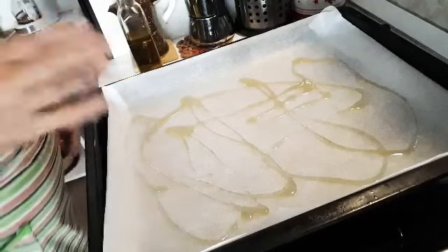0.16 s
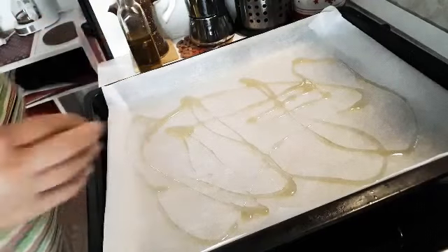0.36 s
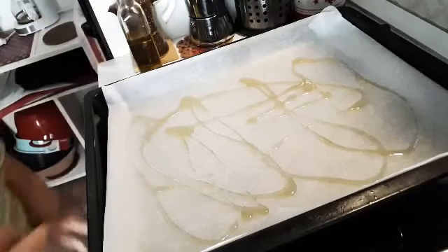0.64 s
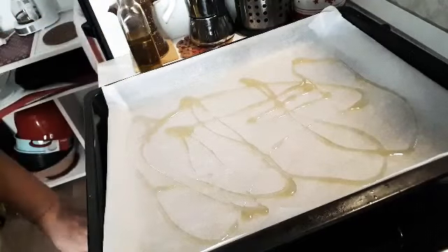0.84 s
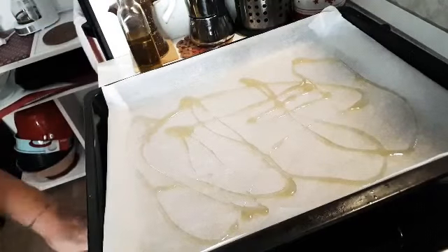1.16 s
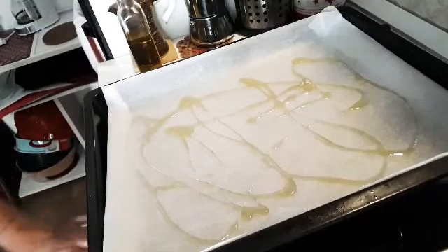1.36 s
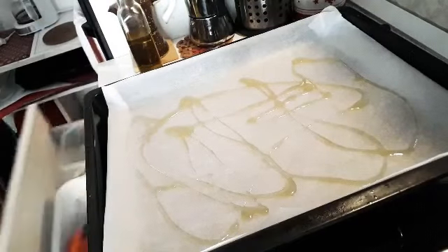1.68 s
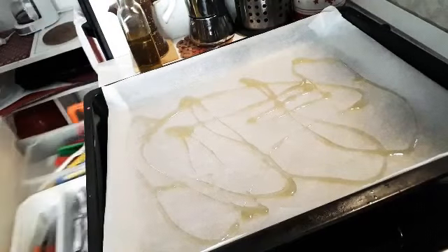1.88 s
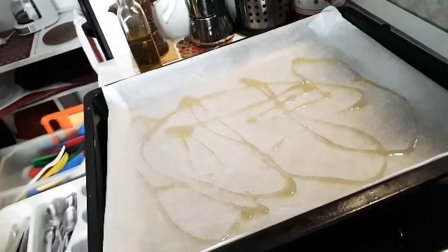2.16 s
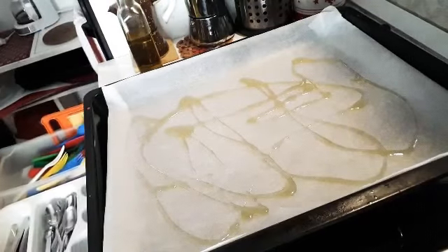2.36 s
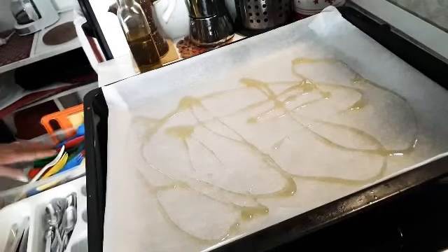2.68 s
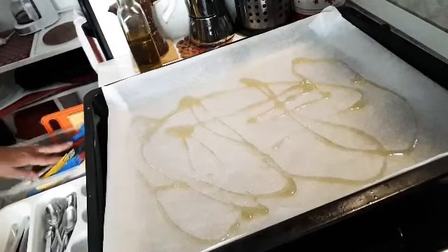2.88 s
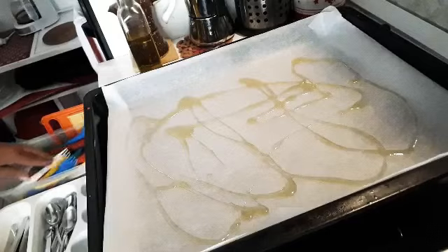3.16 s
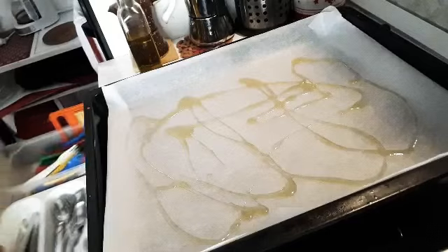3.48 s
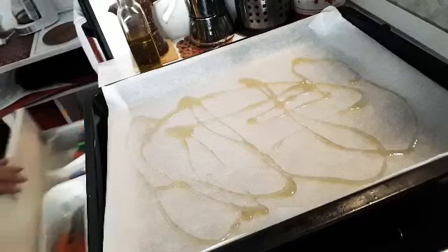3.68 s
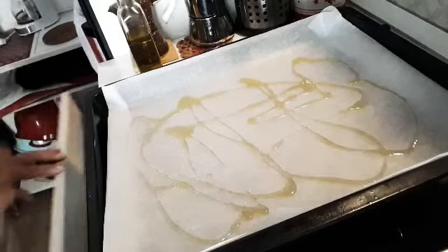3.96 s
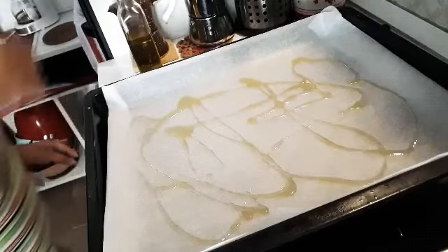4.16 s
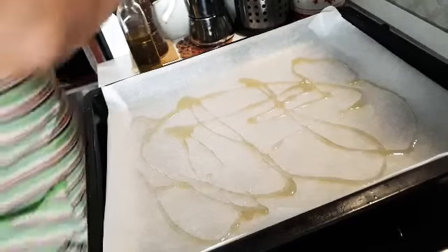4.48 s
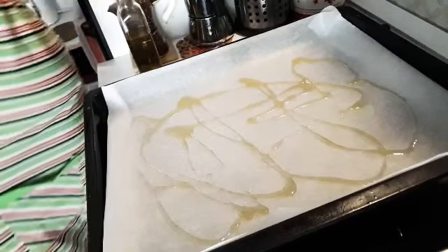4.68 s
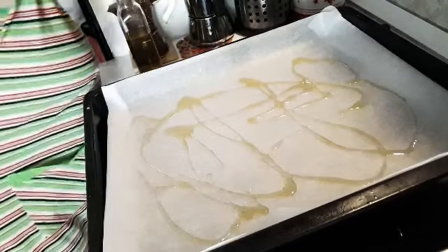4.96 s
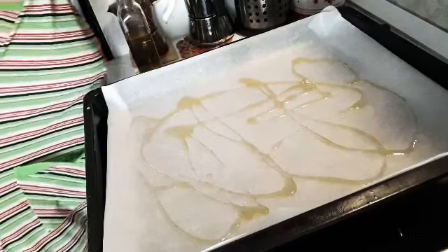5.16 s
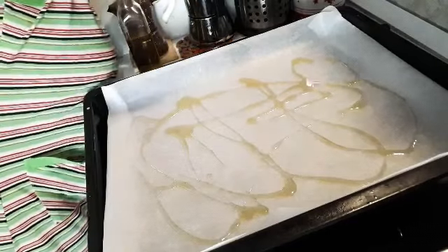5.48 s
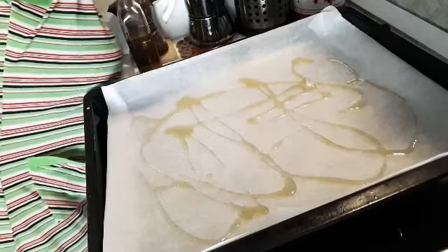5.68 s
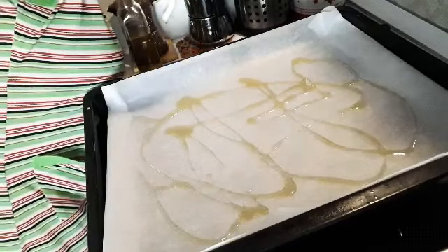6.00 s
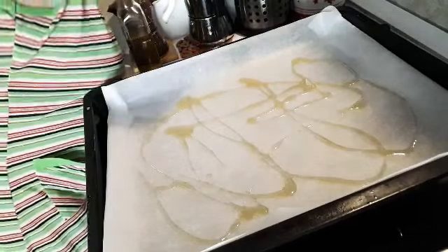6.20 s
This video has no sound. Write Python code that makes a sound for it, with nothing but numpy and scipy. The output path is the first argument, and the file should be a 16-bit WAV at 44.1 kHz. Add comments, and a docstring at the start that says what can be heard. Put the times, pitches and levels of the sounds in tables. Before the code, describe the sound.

Faint cloth rustle and low hum, a drawer rumbling open, utensils rattling, a hard wooden slam, then small clinks and a final heavy set-down thunk.

```python
"""A faint swish of clothes over an appliance hum, then a drawer rolls open and bumps its stop.
A hand stirs plastic utensils; the drawer is pushed shut with a jingle of cutlery and a slam.
Then things are slid, knocked and set down on the counter.
Blows ring damped modes, friction is filtered trains of random slips, cloth and air are filtered noise.
Two spaced microphones hear the small hard room as direct sound, early reflections and a tail."""
import sys
import numpy as np
from scipy import signal
from scipy.fft import rfft, irfft
from scipy.io import wavfile

SR = 44100
rng = np.random.default_rng(int(sys.argv[2]) if len(sys.argv) > 2 else 0)


def dump(signal):
    """Clip the signal to [-1, 1] and save it as 16-bit WAV at the path in sys.argv[1]."""
    limited = np.clip(np.atleast_2d(signal).T, -1, 1)
    pcm = np.round(limited * 32767).astype(np.int16)
    wavfile.write(sys.argv[1], SR, pcm)


N = 279098
TIME_S = np.arange(N) / SR

# drawer pulled out, then pushed in: (start [s], fastest [s], end [s], relative rumble at top speed [dB],
# relative grit at top speed [dB], slowing time constant [s], creep as share of top speed [1])
STROKES = [(1.327, 1.984, 2.29, -48, -62, 0.094, 0.037), (3.514, 3.798, 4.55, -48.5, -65, 0.21, 0.043)]
# drawer meets the end of its travel: (first touch [s], relative level [dB], thump offset [dB],
# click offset [dB], time between rebounds [s])
STOPS = [(2.292, -43.5, 4, -6, 0.028), (4.499, -26.5, -1.5, -10, .016)]
# box jolts on its rails: (time [s], relative level [dB], hardness [dB], rattle time constant [s])
JOLTS = [(1.965, -47, -11, 0.014), (3.452, -59.5, -14, 0.016), (3.61, -42.5, -7, 0.0033),
         (3.824, -48, -10, 0.004), (4.474, -58, -4, 0.0037)]
# plastic utensils and their tray: (time [s], relative level [dB], hardness [dB], rattle time constant [s])
UTENSIL_BLOWS = [(1.755, -46.5, -0.5, 0.015), (1.779, -34.5, -2, 0.0039), (1.791, -40.5, 4, 0.0091),
                 (1.812, -47.5, 1, 0.0025), (1.916, -54.5, 11.5, 0.0054), (2.039, -56, -6, 0.0088),
                 (2.924, -57.5, -1.5, 0.018), (2.958, -58, -7, .003), (3.007, -51, 0.5, 0.0025),
                 (3.025, -46.5, -1, 0.0064), (3.044, -53.5, 3.5, 0.0081), (3.073, -58.5, 12.5, 0.0021),
                 (3.084, -50, 2, 0.0035), (3.095, -55, -1, 0.0023), (3.128, -55, -8, 0.002),
                 (3.286, -56.5, 1.5, 0.011), (3.703, -55.5, -14, 0.0057)]
# cutlery slides and clinks: (time [s], relative level [dB], hardness [dB], rattle time constant [s])
CUTLERY_BLOWS = [(3.931, -47, 5.5, 0.025), (3.965, -38, -2, 0.0056), (3.981, -40.5, -4.5, .002),
                 (4.036, -39, -4, 0.008), (4.116, -59, 4, 0.0055)]
# taps on a hollow handle: (time [s], relative level [dB], pitch [Hz])
HANDLE_TAPS = [(2.962, -36, 1200), (3.128, -30, 1107)]
# plastic sliding on plastic: (middle [s], relative level [dB], bell half length [s])
SCRAPES = [(1.98, -58.5, 0.11), (2.965, -50.5, 0.032), (3.092, -48.5, 0.02), (3.22, -65.5, 0.077)]
# rasp of the rails: (middle [s], relative level [dB], bell half length [s], centre [Hz],
# pitch slope [octaves/s])
RASPS = [(1.567, -68.5, 0.063, 680, 7), (1.7, -60, .075, 1100, -1.5), (3.572, -66, 0.016, 1490, 4),
         (3.675, -61.5, 0.078, 1240, 3.5), (3.715, -63, 0.019, 2300, -7), (3.818, -57, .025, 577, 13)]
# faint squeak of a runner: (middle [s], relative level [dB], bell half length [s])
SQUEAKS = [(2.21, -73, 0.071)]
# cabinet booms when jolted: (time [s], relative level [dB])
BOOMS = [(1.307, -53), (1.93, -68), (2.03, -60), (2.329, -39.5), (2.389, -35), (2.548, -52), (4.503, -29.5),
         (4.566, -32), (4.655, -47.5), (4.769, -50.5), (4.851, -49), (5.015, -56.5)]
# kitchenware knocks on the counter: (time [s], relative level [dB], hardness [dB], rattle time constant [s])
WARE_BLOWS = [(5.276, -70, -3.5, 0.01), (5.36, -53, -5, 0.007), (5.386, -51, 1, 0.0032),
              (5.494, -51, 4.5, 0.0043), (5.546, -50.5, 7.5, 0.0084), (5.563, -49, -3.5, 0.011),
              (5.708, -60, -7, 0.0023), (5.798, -58.5, 1, 0.0023), (5.859, -69.5, 1.5, 0.0089),
              (5.912, -59.5, 3, 0.0093), (5.93, -53.5, -3, 0.0034), (5.956, -57, -9, 0.0063),
              (6.028, -59, -9, 0.0052), (6.059, -54, 3.5, 0.0026), (6.114, -48.5, 6.5, 0.0015),
              (6.155, -58.5, -8, 0.0087), (6.222, -52, 2, 0.0037), (6.24, -32.5, 2.5, 0.0042),
              (6.247, -36.5, 3.5, 0.0085)]
# something heavy lands on the worktop: (time [s], relative level [dB])
LANDINGS = [(5.361, -64), (5.566, -46), (5.708, -54), (6.114, -45), (6.24, -17.5)]
# glass bottle nudged: (time [s], relative level [dB])
BOTTLE_CLINKS = [(5.388, -57), (5.496, -64), (5.566, -44.5)]
# small pieces tick together: (time [s], relative level [dB], pitch [Hz])
TICKS = [(5.33, -62, 2550), (5.362, -42, 2620), (5.468, -51, 1720), (5.865, -58, 4400), (5.932, -42, 4110),
         (6.117, -32, 5420), (6.159, -45, 4050), (6.188, -46, 2640)]
# kitchenware slides over the counter: (middle [s], relative level [dB], bell half length [s])
SLIDES = [(5.335, -75, 0.02), (5.47, -53, 0.06), (5.9, -71, 0.048), (6.19, -49.5, 0.062)]
# clothes swish: (middle [s], relative level [dB], bell half length [s])
SWISHES = [(.06, -62.5, 0.053), (0.564, -71, 0.054), (0.94, -69, 0.062), (1.21, -58, 0.07),
           (1.534, -70.5, 0.061), (2.263, -65, 0.082), (2.803, -75, 0.036), (4.34, -71.5, 0.14),
           (4.74, -62, 0.11), (4.888, -64.5, 0.042)]
# appliance hum partials: (frequency [Hz], level [dB], waver depth [dB])
HUM = [(95.5, -72, -4.5), (199.6, -78, 0)]

# drawer box resonances: (frequency [Hz], relative level [dB], t60 [s])
DRAWER_MODES = [(160, 5, 0.18), (199, 9.5, 0.24), (311, 9, 0.16), (425, 4, 0.22), (523.5, 4, 0.22),
                (655, -6, 0.35), (825, -6, 0.13), (944, -10, 0.25), (1052, 1.5, 0.28), (1175, -7.5, 0.23),
                (1400, -14, 0.3), (1740, -7.5, 0.39), (1895, 0, .14)]
# plastic utensil resonances: (frequency [Hz], relative level [dB], t60 [s])
UTENSIL_MODES = [(433, -6.5, 0.041), (710, 9, 0.081), (1012, -2.5, 0.15), (1194, -28, 0.36),
                 (1224, -16, 0.08), (2187, 1, 0.051), (3380, -43, 0.026)]
# cutlery resonances: (frequency [Hz], relative level [dB], t60 [s])
CUTLERY_MODES = [(1860, 0.5, 0.055), (1880, 1, 0.065), (2239, -2.5, 0.099), (2350, -4.5, 0.1),
                 (3036, -6, .15), (3601, -1, 0.15), (4743, -9.5, .11)]
# kitchenware resonances: (frequency [Hz], relative level [dB], t60 [s])
WARE_MODES = [(520, 0, 0.0075), (645, 7.5, 0.15), (1886, 2.5, 0.12), (2410, -5.5, 0.14), (2622, -3, 0.098),
              (2780, -9, 0.11), (4100, -5, 0.071), (4860, -9, 0.15), (5200, -18, 0.2), (6200, -22, 0.17),
              (7560, -1, 0.093)]
# worktop resonances: (frequency [Hz], relative level [dB], t60 [s])
WORKTOP_MODES = [(292, -16.5, 0.12), (370, -28, 0.042), (580, 2.5, 0.034), (636, -20.5, 0.61)]
# glass bottle resonances: (frequency [Hz], relative level [dB], t60 [s])
BOTTLE_MODES = [(720, -0.5, 0.29), (2218, -18, 0.096), (3451, -4, 0.19), (3905, -4.5, 0.19),
                (5416, -7, 0.13), (7500, 2, 0.11)]

# dense short resonances of the drawer box: (frequency [Hz], relative level [dB per Hz])
DRAWER_COLOUR = [(30, -49), (55, -9.5), (100, 4.5), (200, 1), (270, -1.5), (450, -0.5), (800, -7),
                 (1300, -13), (2300, -11.5), (5000, -23.5), (8000, -26), (10000, -48.5), (15000, -46)]
# dense short resonances of the utensils: (frequency [Hz], relative level [dB per Hz])
UTENSIL_COLOUR = [(60, -23.5), (160, -4.5), (400, 8.5), (750, 1.5), (1200, -5.5), (1700, -5.5),
                  (2500, -4.5), (4500, -15), (7500, -17), (12000, -22.5), (15000, -41.5)]
# dense short resonances of the cutlery: (frequency [Hz], relative level [dB per Hz])
CUTLERY_COLOUR = [(60, -29), (150, -23.5), (550, -14.5), (900, -8), (1700, -12.5), (1950, 5), (2250, -5.5),
                  (4000, -13), (8000, -21.5), (11000, -27), (13000, -53)]
# dense short resonances of the kitchenware: (frequency [Hz], relative level [dB per Hz])
WARE_COLOUR = [(50, -34), (110, -3), (200, -5.5), (300, 2.5), (420, -3), (620, 1.5), (900, -11.5),
               (1400, -12), (2000, -13.5), (3500, -17), (7500, -20), (12000, -30), (15000, -31.5)]
# the whole load clashing: (frequency [Hz], relative level [dB per Hz])
LOAD_COLOUR = [(100, -21), (600, -1.5), (2000, 0), (5000, -6.5), (8000, -9.5), (12000, -10.5), (15000, -22)]
# roller rumble: (frequency [Hz], relative level [dB per Hz])
RUMBLE_COLOUR = [(100, -29), (250, -13), (340, 1), (550, -1.5), (680, -7.5), (900, -14), (1500, -21),
                 (2500, -36), (4000, -63)]
# growl of the hollow box: (frequency [Hz], relative level [dB per Hz])
GROWL_COLOUR = [(40, -38), (75, -3.5), (110, -4), (160, 7), (230, -3), (330, 0.5), (600, -40),
                (1500, -83.5)]
# grit in the rails: (frequency [Hz], relative level [dB per Hz])
GRIT_COLOUR = [(500, -7), (1000, 1.5), (1600, 3), (2300, 3), (4000, -9.5), (7500, -8.5), (10000, -35),
               (15000, -42)]
# plastic sliding on plastic: (frequency [Hz], relative level [dB per Hz])
RUSTLE_COLOUR = [(150, -20.5), (500, 12), (1200, 6), (2000, 1), (5000, -2.5), (8000, -8), (12000, -23.5),
                 (15000, -22)]
# fabric on fabric: (frequency [Hz], relative level [dB per Hz])
CLOTH_COLOUR = [(500, -46), (1000, -23), (1400, -14.5), (2700, -8.5), (4000, -9.5), (7800, -8.5),
                (15000, -20.5)]
# still air: (frequency [Hz], relative level [dB per Hz])
AIR_COLOUR = [(15, -51), (25, -8.5), (109, 1), (213, -16.5), (271, -13), (637, -24.5), (749, -20.5),
              (1310, -29.5), (1670, -30), (12800, -33.5), (15000, -34)]
# decay of the room: (frequency [Hz], t60 [s])
ROOM_T60 = [(100, 0.7), (250, 0.26), (800, 0.36), (2500, 0.3), (7000, 0.31), (15000, 0.33)]
# left-right agreement of diffuse sound: (frequency [Hz], coherence [1])
COHERENCE = [(60, 0.83), (130, 0.96), (300, 0.8), (640, 0.6), (1300, 0), (15000, 0.021)]
# microphone response: (frequency [Hz], gain [dB])
MICROPHONE = [(20, -8.5), (40, -0.5), (60, 0), (7900, 0), (9100, -4.5), (10800, -0.5), (13000, -0.5),
              (15000, -8.5)]
# borders of thump, knock and click: (lower [Hz], upper [Hz])
BAND_EDGES_HZ = (400, 2500)
# range of the thin partials of struck pieces: (lowest [Hz], highest [Hz])
TINKLE_HZ = (1497.4, 12130)

PUSH_POWER = 1.49  # speed grows with this power of time
GROWL_DB, GROWL_POWER = -4, 0.43  # growl against rumble; power of speed it follows
GRIT_POWER = 0.89  # power of speed the grit follows
LUMPS_DB, LUMPS_HZ = 3.7, 24.07  # rms depth and fastest rate of the uneven rolling
FIRST_TOUCH_DB, TOUCH_HARDNESS_DB = -3.5, 2.5  # light clicky touch ahead of the main strike
REBOUND_LOSS_DB, REBOUND_RATTLE_S = 4.5, 0.0072
LOAD_LAG_S, LOAD_DB, LOAD_HARDNESS_DB, LOAD_RATTLE_S = 0.042, -15, 8.5, 0.033
FIRST_CONTACT_DB = -2.5  # gain of a blow's first contact
RASP_WIDTH = 0.86  # bandwidth of each resonance / centre frequency
SQUEAK_HZ = 1950
TINKLE_T60_S, TINKLE_SPREAD_DB = 0.071, 4
TICK_OVERTONE, TICK_OVERTONE_DB = 1.3, -9  # second partial: ratio to pitch, level against the first
AIR_DB = -74.5
BAND_LIMIT_HZ = 15250


def drawer():
    """The box rolls, jolts and hits its stops; its load knocks, slides and clinks."""
    rails = blows(JOLTS, DRAWER_MODES, DRAWER_COLOUR, ring_db=1.0, chatter_db=30,
                  direct_db=6.5, lead_ms=0.28, thump_db=-23.5, click_db=-52)
    plastic = blows(UTENSIL_BLOWS, UTENSIL_MODES, UTENSIL_COLOUR, ring_db=-7.5, chatter_db=9,
                    direct_db=-7.5, lead_ms=0.22, thump_db=-10.0, click_db=-3.5, tinkle_db=-14)
    metal = blows(CUTLERY_BLOWS, CUTLERY_MODES, CUTLERY_COLOUR, ring_db=-7.5, chatter_db=7,
                  direct_db=-9.5, lead_ms=0.14, thump_db=-16, click_db=-9, tinkle_db=-11)
    stirring = friction(swells(SCRAPES), RUSTLE_COLOUR, 340, 7.4, 0.2)
    box = stops() + rails + plastic + handle() + stirring + runners() + rasp() + squeak()
    # left/right balance in dB
    return box * amp([[0.5], [-0.5]]) + metal * amp([[1.4], [-1.4]])


def runners():
    """Rumble, growl and grit follow different powers of speed; growl persists most at low speed."""
    rumble = growl = grit = 0
    for start_s, fastest_s, end_s, rumble_db, grit_db, slowing_s, creep in STROKES:
        v = speed(start_s, fastest_s, end_s, slowing_s, creep)
        rumble = rumble + amp(rumble_db) * v
        growl = growl + amp(rumble_db + GROWL_DB) * v ** GROWL_POWER
        grit = grit + amp(grit_db) * v ** GRIT_POWER
    lumps = amp(LUMPS_DB * waver(LUMPS_HZ))
    rolling = friction(rumble * lumps, RUMBLE_COLOUR, 900, 4.9, 0.17)
    growling = friction(growl * lumps, GROWL_COLOUR, 1400, 2.5, 0.2)
    return rolling + growling + friction(grit, GRIT_COLOUR, 820, 4.8, 0.2)


def speed(start_s, fastest_s, end_s, slowing_s, creep):
    """Share of top speed: gentle start, exponential slowing to a creep, dead halt at the end."""
    push = np.clip((TIME_S - start_s) / (fastest_s - start_s), 0, 1) ** PUSH_POWER
    coast = creep + (1 - creep) * np.exp(-np.maximum(TIME_S - fastest_s, 0) / slowing_s)
    return push * coast * (TIME_S < end_s)


def stops():
    """The wooden box strikes the end of its rails; its load clashes just after."""
    box = 0
    for s, db, thump_db, click_db, gap_s in STOPS:
        box = box + blows(rebounds(s, db, gap_s), DRAWER_MODES, DRAWER_COLOUR, ring_db=-8, chatter_db=7.5,
                          direct_db=-6.0, lead_ms=0.2, thump_db=thump_db, click_db=click_db, tinkle_db=-18)
    clashes = [(s + LOAD_LAG_S, db + LOAD_DB, LOAD_HARDNESS_DB, LOAD_RATTLE_S) for s, db, *_ in STOPS]
    load = blows(clashes, CUTLERY_MODES, LOAD_COLOUR, ring_db=-11, chatter_db=8.5,
                 direct_db=-6.5, lead_ms=0.2, thump_db=-7.5, click_db=-9, tinkle_db=-10)
    return box + load


def rebounds(s, db, gap_s, count=3):
    """Light touch, main strike, then evenly spaced weaker rebounds."""
    rows = [(s, db + FIRST_TOUCH_DB, TOUCH_HARDNESS_DB, REBOUND_RATTLE_S)]
    for k in range(count):
        rows.append((s + (k + 1) * gap_s, db - REBOUND_LOSS_DB * k, 0, REBOUND_RATTLE_S))
    return rows


def handle(t60_s=0.019, rise_s=0.00095, direct_db=-6):
    """A hollow handle gives a short pitched knock: one damped mode with a soft onset."""
    out, t = np.zeros((2, N)), np.arange(SR // 4) / SR
    for s, db, hz in HANDLE_TAPS:
        knock = modal([(hz, db, t60_s)], t) * (1 - np.exp(-t / rise_s))
        add(out, s, kitchen(knock, direct_db, 0.13))
    return out


def rasp(per_s=420, spread_db=4.0):
    """Uneven slips in the rails excite a broad resonance that glides in pitch."""
    out = 0
    for s, db, half_s, centre_hz, octaves_per_s in RASPS:
        hz = centre_hz * 2 ** (octaves_per_s * np.clip(TIME_S - s, -3 * half_s, 3 * half_s))
        width_hz = RASP_WIDTH * centre_hz
        grain = resonate(slips(per_s, spread_db), hz, width_hz)
        grain = resonate(grain, hz, width_hz)
        out = out + evened(grain) * swells([(s, db, half_s)])
    return kitchen(out, -9, 0.19)[:, :N]


def squeak(drift=0.012):
    """A dry runner squeaks: a thin tone of unsteady pitch (drift is its rms share)."""
    hz = SQUEAK_HZ * (1 + drift * waver(19))
    tone = np.sin(2 * np.pi * np.cumsum(hz) / SR)
    return kitchen(evened(tone) * swells(SQUEAKS), -7, 0.1)[:, :N]


def cabinet(hz=104, t60_s=0.32, rise_s=0.00264):
    """The cabinet's lowest mode booms on after the bumps."""
    out, t = np.zeros((2, N)), np.arange(SR) / SR
    decay = np.exp(-np.log(1000) * t / t60_s)
    boom = np.sin(2 * np.pi * hz * t) * decay * (1 - np.exp(-t / rise_s))
    for s, db in BOOMS:
        add(out, s, amp(db) * np.array([boom, boom]))
    return out


def counter():
    """Kitchenware is slid, nudged and set down; the worktop thunks and a bottle rings."""
    knocks = blows(WARE_BLOWS, WARE_MODES, WARE_COLOUR, ring_db=-8.5, chatter_db=4.5,
                   direct_db=-9.0, lead_ms=-0.09, thump_db=-3.5, click_db=-0.5, tinkle_db=-14.5)
    worktop = rings(LANDINGS, WORKTOP_MODES, contact_s=0.0035, room_db=-12)
    bottle = rings(BOTTLE_CLINKS, BOTTLE_MODES, contact_s=0.00044, room_db=-18)
    sliding = friction(swells(SLIDES), WARE_COLOUR, 300, 4.8, -0.09)
    return (knocks + worktop + bottle + ticks() + sliding) * amp([[0.3], [-0.3]])


def rings(rows, modes, contact_s, room_db):
    """A knock rings modes cleanly; a longer contact starts them more slowly."""
    out, t = np.zeros((2, N)), np.arange(SR // 2) / SR
    for s, db in rows:
        ring = amp(db) * modal(modes, t) * (1 - np.exp(-t / contact_s))
        add(out, s, amp(room_db) * kitchen(ring, -room_db, -0.09))  # direct sound at unity
    return out


def ticks(t60_s=0.032, room_db=-5):
    """Small hard pieces give short ticks of two damped partials."""
    out, t = np.zeros((2, N)), np.arange(SR // 8) / SR
    for s, db, hz in TICKS:
        partials = [(hz, db, t60_s), (hz * TICK_OVERTONE, db + TICK_OVERTONE_DB, t60_s)]
        add(out, s, amp(room_db) * kitchen(modal(partials, t), 1, -0.09))
    return out


def clothes():
    """Fabric brushes on fabric: filtered noise in soft, unsteady swells."""
    return evened(coloured(diffuse(N), CLOTH_COLOUR)) * swells(SWISHES) * amp(3.2 * waver(8.8))


def background():
    """An appliance hum over still air; the level of the hum wavers gently."""
    hum = 0
    for hz, db, depth_db in HUM:
        level = np.sqrt(2) * amp(db + depth_db * np.tanh(waver(14.0)))
        hum = hum + level * np.sin(2 * np.pi * hz * TIME_S + 0.5 * waver(3.0))
    return hum + amp(AIR_DB) * evened(coloured(diffuse(N), AIR_COLOUR))


def blows(rows, modes, colour, ring_db, chatter_db, direct_db, lead_ms, thump_db, click_db,
          tinkle_db=-30, size=12288, count=2):
    """A contact plus swelling, dying chatter rings the thing; harder is more click, less thump."""
    out, t = np.zeros((2, N)), np.arange(size) / SR
    dense = unit(coloured(1.0 * (t == 0), colour))[:2048]
    for s, db, hardness_db, rattle_s in rows:
        age = t / max(rattle_s, 0.001)
        contacts = rng.standard_normal(size) * (rng.random(size) < 1500 / SR)  # 1500 per s
        chatter = contacts * np.sqrt(age) * np.exp(-age)
        force = amp(FIRST_CONTACT_DB) * (t == 0) + amp(chatter_db) * chatter
        # contacts fall on different spots, each with its own ring and paths to the microphones
        spot, sound = rng.integers(0, count, size), 0
        for k in range(count):
            body = amp(ring_db) * unit(modal(modes, t)) + amp(tinkle_db) * tinkle(colour, t)
            body[:len(dense)] += dense
            struck = signal.fftconvolve(force * (spot == k), body)[:size]
            sound = sound + kitchen(struck, direct_db, lead_ms, size=16384)
        levels_db = db + np.array([thump_db - hardness_db, 0, click_db + hardness_db])
        add(out, s, voiced(sound, levels_db))
    return out


def voiced(sound, levels_db, window_s=0.021):
    """Tilts a blow's spectrum by its first moments towards the given thump, knock and click."""
    power = abs(rfft(sound[:, :round(window_s * SR)], 2048)) ** 2 / (1024 * window_s * SR)
    band = np.digitize(np.fft.rfftfreq(2048, 1 / SR), BAND_EDGES_HZ)
    thump, knock, click = levels_db - 10 * np.log10(np.bincount(band, power.mean(0)))
    return coloured(sound, [(240, thump), (480, knock), (1300, knock), (3200, click)])


def modal(modes, t):
    """Damped modes started at t = 0; each level varies at random with where the blow lands."""
    out = 0
    for hz, db, t60_s in modes:
        decay = np.exp(-np.log(1000) * t / t60_s)
        out = out + amp(db + rng.normal(0, 1.0)) * decay * np.cos(2 * np.pi * hz * t)
    return out


def tinkle(colour, t, count=16):
    """Thin partials drawn afresh for each struck piece, a few standing out."""
    hz = np.geomspace(*TINKLE_HZ, count) * rng.uniform(0.9, 1.1, count)
    levels_db = read(colour, hz) + 10 * np.log10(hz) + TINKLE_SPREAD_DB * rng.standard_normal(count)
    return unit(modal([(f, db, TINKLE_T60_S) for f, db in zip(hz, levels_db)], t))


def friction(level, colour, per_s, spread_db, lead_ms):
    """Countless small slips at the given gain over time, heard in the room."""
    grain = evened(coloured(slips(per_s, spread_db), colour))
    return kitchen(grain * level, -5.5, lead_ms)[:, :N]


def slips(per_s, spread_db):
    """A random train of tiny slips of uneven size."""
    happens = rng.random(N) < per_s / SR
    size_db = spread_db * np.minimum(rng.exponential(1, N), 4)
    return rng.choice([-1, 1], N) * happens * amp(size_db)


def resonate(x, hz, width_hz):
    """A resonance gliding along the curve hz: shift to 0 Hz, low-pass, shift back."""
    turn, r = np.exp(2j * np.pi * np.cumsum(hz) / SR), np.exp(-np.pi * width_hz / SR)
    return 2 * (turn * signal.lfilter([1 - r], [1, -r], x / turn + 1e-18)).real


def swells(rows):
    """Gain over time of movements that swell and fade in a bell shape."""
    return sum(amp(db) * np.exp(-((TIME_S - s) / half_s) ** 2 / 2) for s, db, half_s in rows)


def waver(rate_hz, count=12):
    """Slow drift of rms 1: sines of random phase up to rate_hz."""
    knots_s = np.linspace(0, N / SR, N // 256)
    rates_hz = np.geomspace(rate_hz / 10, rate_hz, count)
    drift = sum(np.sin(2 * np.pi * (f * knots_s + rng.random())) for f in rates_hz)
    return evened(np.interp(TIME_S, knots_s, drift))


def kitchen(x, direct_db, lead_ms, near_db=0, near_s=0.0096, size=24576):
    """Direct sound, quick reflections off the cupboards, room tail; lead_ms > 0 reaches the left first."""
    t = np.arange(size) / SR
    hz, frame_s, z = signal.stft(diffuse(size), SR, nperseg=256)
    decay = amp(-60 * frame_s / read(ROOM_T60, hz)[:, None])
    tail = signal.istft(z * decay, SR, nperseg=256)[1][:, :size]
    near = unit(diffuse(size) * np.exp(-t / near_s))
    response = unit(tail * (1 - np.exp(-t / 0.00043))) + amp(near_db) * near
    lag = round(abs(lead_ms) * SR / 1000)
    response[[0, 1], [0, lag] if lead_ms > 0 else [lag, 0]] += amp(direct_db)
    return signal.fftconvolve(x[None], response, axes=1)


def diffuse(size):
    """Noise from all sides, correlated between the microphones mainly in the bass."""
    a, b = rfft(rng.standard_normal((2, size)))
    same = np.clip(read(COHERENCE, np.fft.rfftfreq(size, 1 / SR)), -1, 1)
    return irfft(np.array([a, same * a + np.sqrt(1 - same ** 2) * b]), size)


def coloured(x, spectrum, size=2048):
    """Causal minimum-phase filter with the given spectrum, so attacks stay sharp."""
    gain_db = np.maximum(read(spectrum, abs(np.fft.fftfreq(size, 1 / SR))), -100)
    log_gain = np.log(amp(gain_db))
    taps = np.fft.ifft(np.exp(np.conj(signal.hilbert(log_gain)))).real
    taps = taps.reshape((1,) * (x.ndim - 1) + (-1,))
    return signal.fftconvolve(x, taps, axes=-1)[..., :x.shape[-1]]


def amp(db):
    """Decibels to gain."""
    return 10 ** (np.asarray(db) / 20)


def evened(x):
    """Scales to rms 1."""
    return x / np.sqrt(np.mean(x ** 2) + 1e-24)


def unit(x):
    """Scales to energy 1."""
    return x / np.sqrt(np.sum(x ** 2) + 1e-24)


def read(points, hz):
    """Reads a table on a log-frequency axis."""
    f, value = np.transpose(points)
    return np.interp(np.log(hz + 1), np.log(f + 1), value)


def add(mix, s, sound):
    """Mixes a sound in at time s."""
    part = mix[:, round(s * SR):][:, :sound.shape[1]]
    part += sound[:, :part.shape[1]]


def scene():
    """Everything in the kitchen."""
    return drawer() + cabinet() + counter() + clothes() + background()


def record(dry):
    """The microphones' colour and the recorder's band limit."""
    low_pass = signal.firwin(511, BAND_LIMIT_HZ, window=("kaiser", 9), fs=SR)
    return signal.oaconvolve(coloured(dry, MICROPHONE), low_pass[None], "same", axes=1)


dry = scene()
out = record(dry)
dump(out)
```